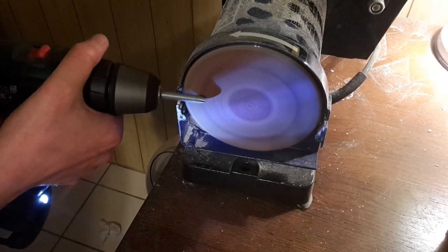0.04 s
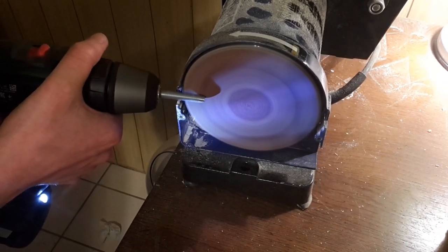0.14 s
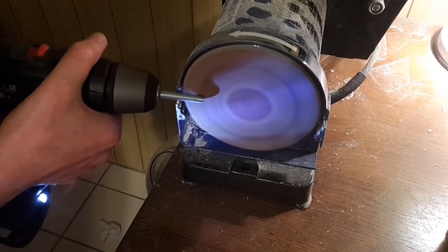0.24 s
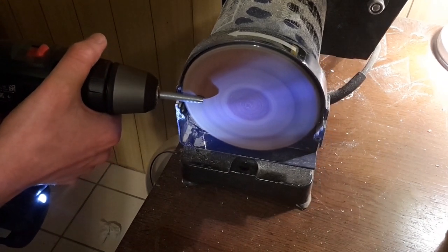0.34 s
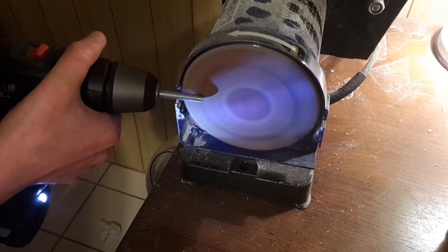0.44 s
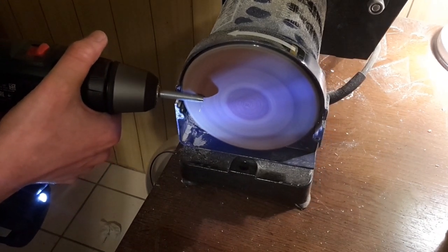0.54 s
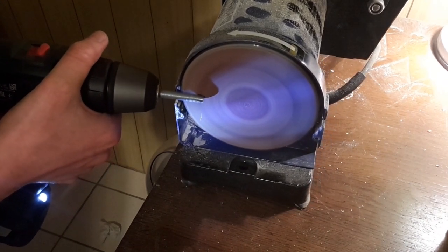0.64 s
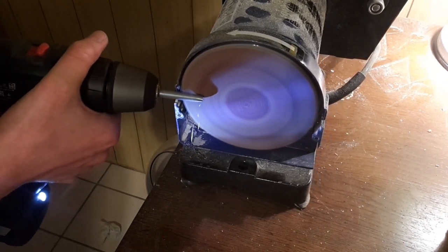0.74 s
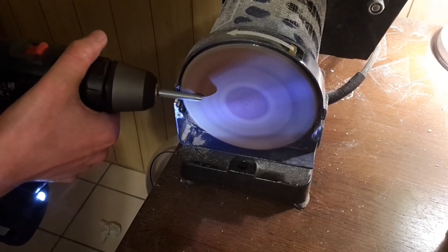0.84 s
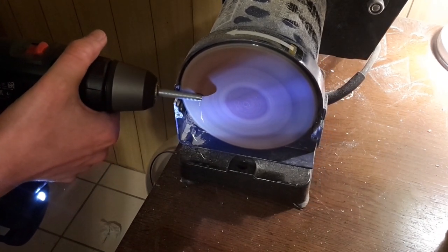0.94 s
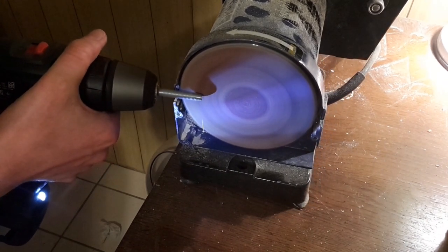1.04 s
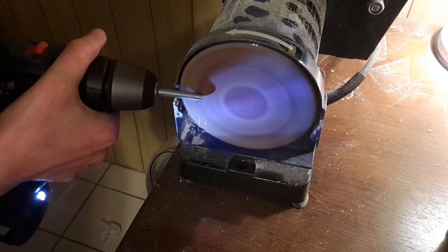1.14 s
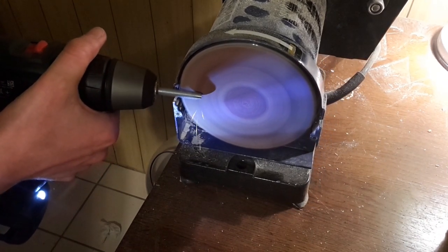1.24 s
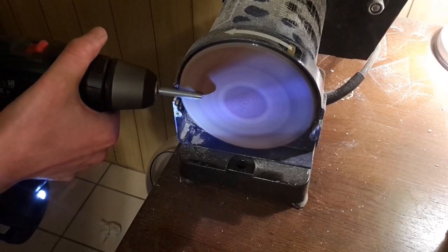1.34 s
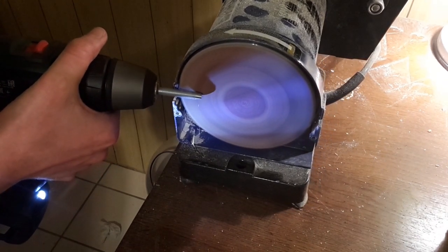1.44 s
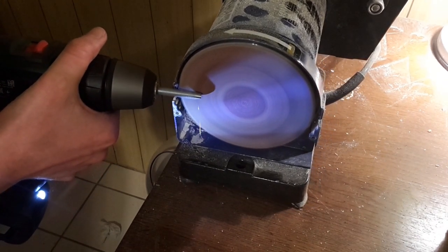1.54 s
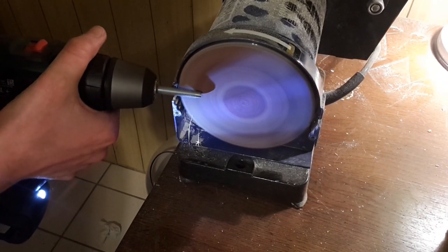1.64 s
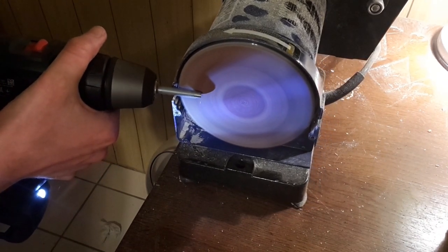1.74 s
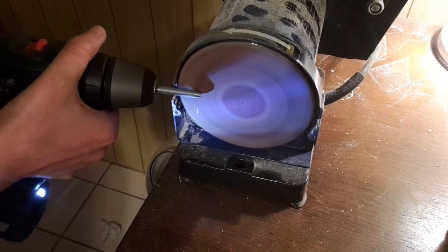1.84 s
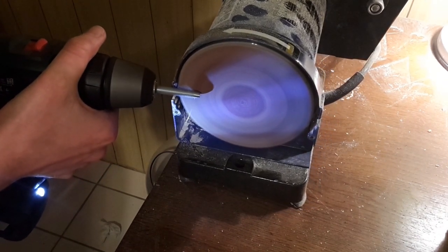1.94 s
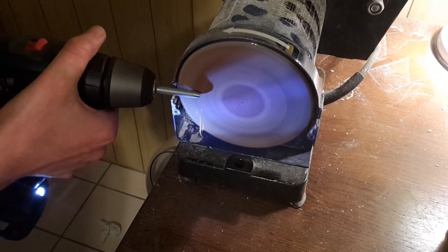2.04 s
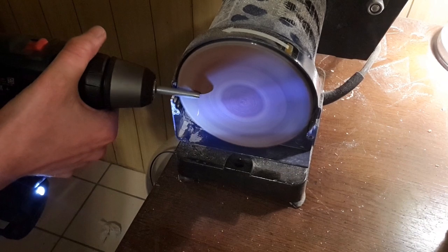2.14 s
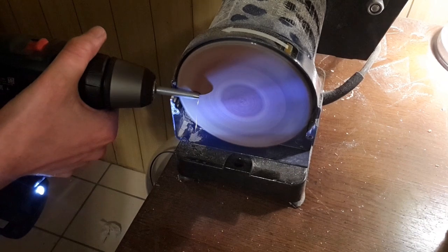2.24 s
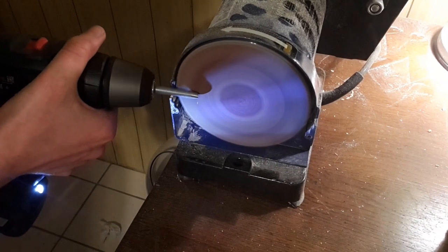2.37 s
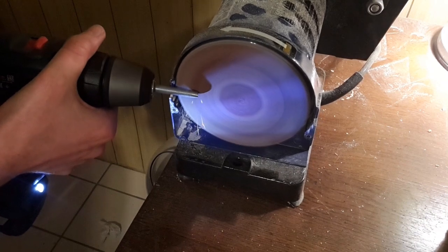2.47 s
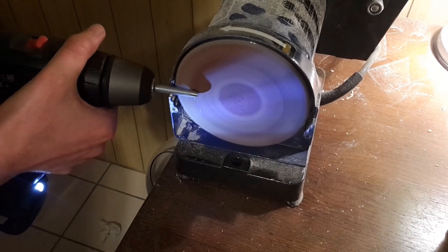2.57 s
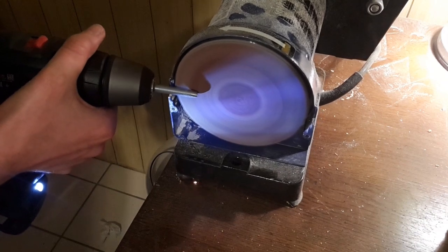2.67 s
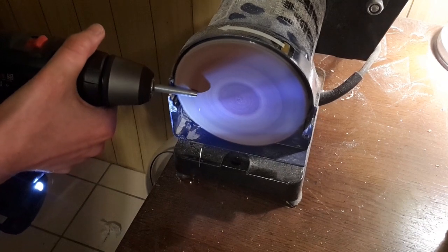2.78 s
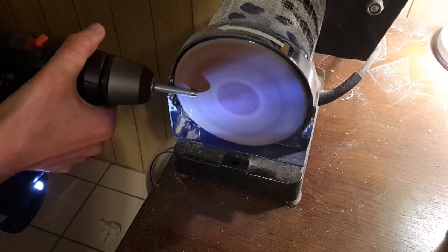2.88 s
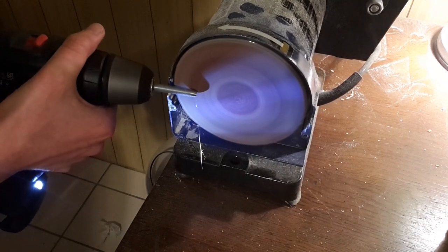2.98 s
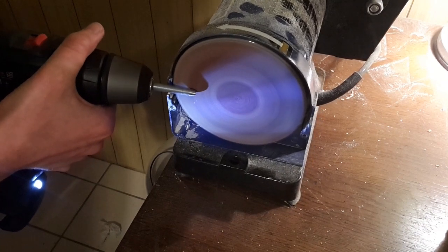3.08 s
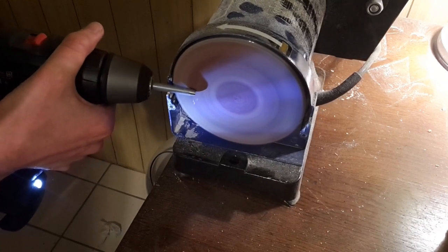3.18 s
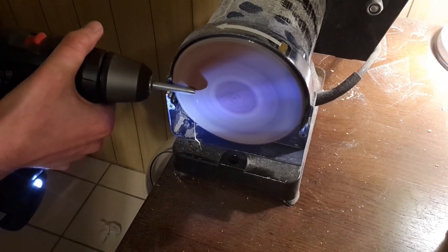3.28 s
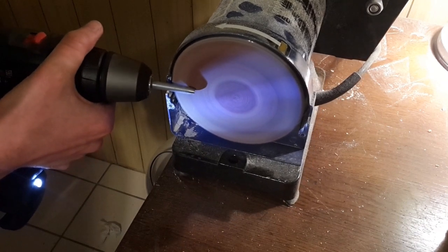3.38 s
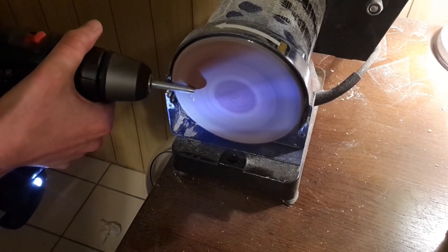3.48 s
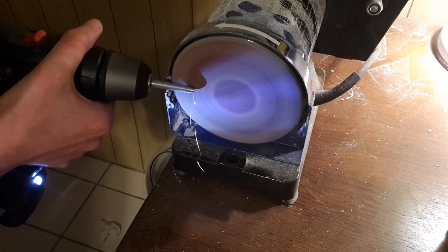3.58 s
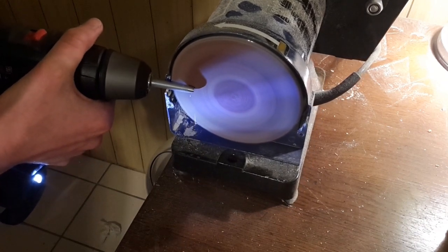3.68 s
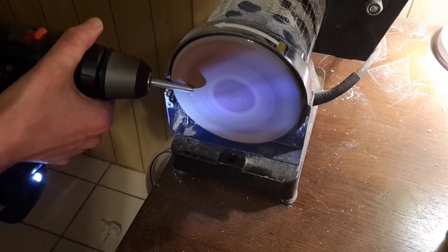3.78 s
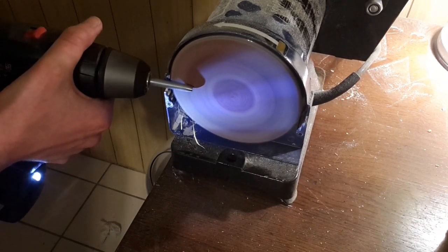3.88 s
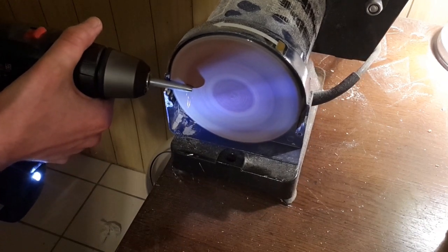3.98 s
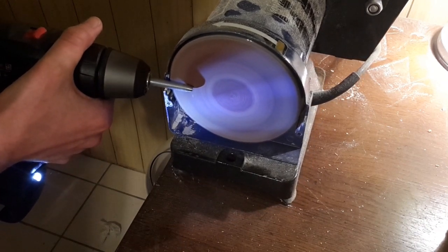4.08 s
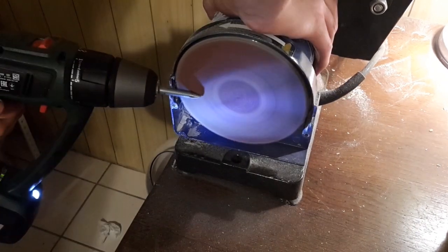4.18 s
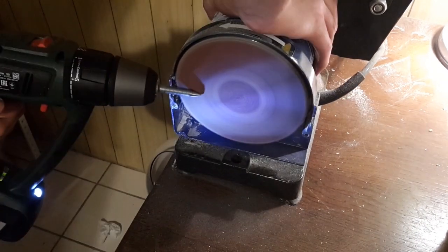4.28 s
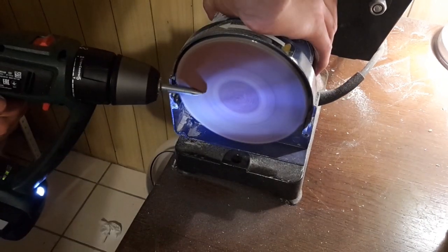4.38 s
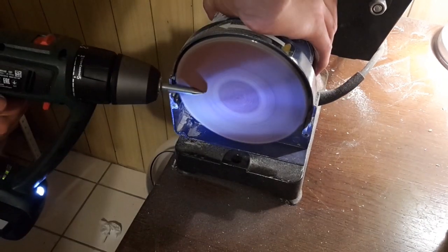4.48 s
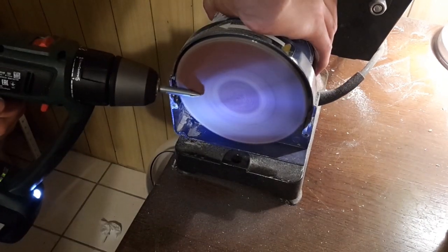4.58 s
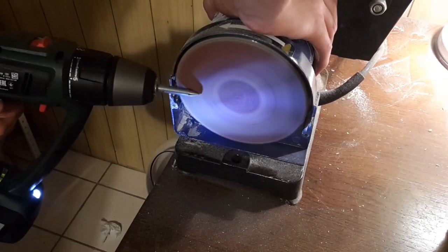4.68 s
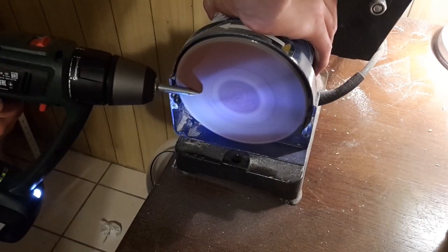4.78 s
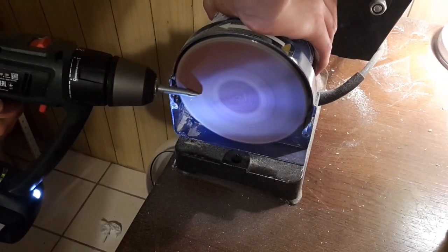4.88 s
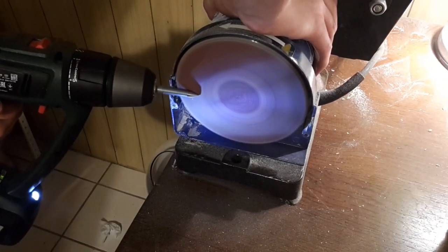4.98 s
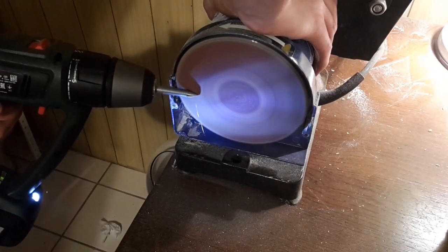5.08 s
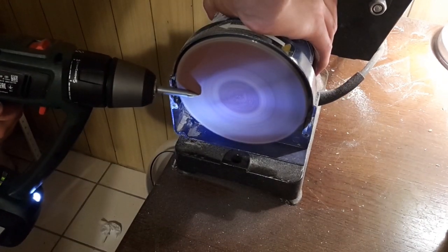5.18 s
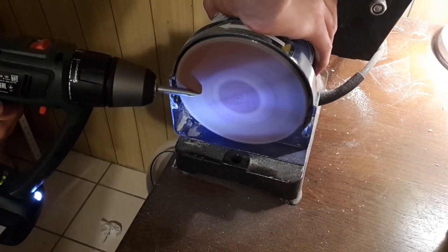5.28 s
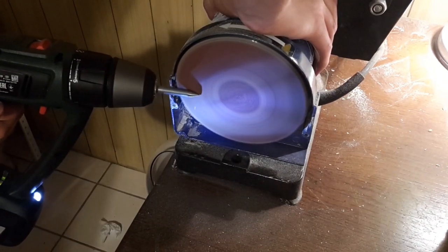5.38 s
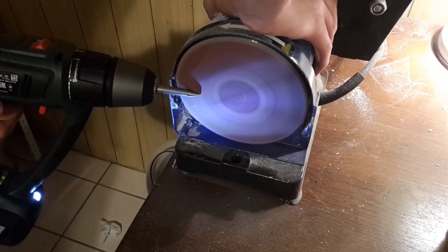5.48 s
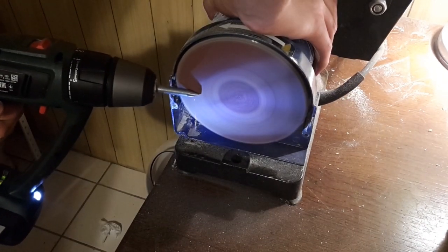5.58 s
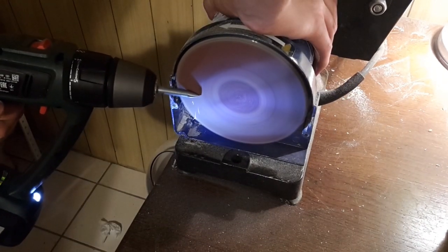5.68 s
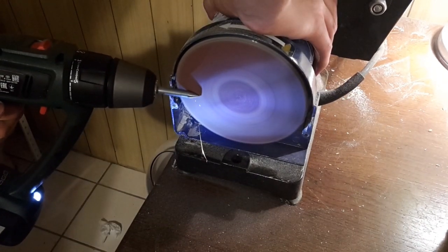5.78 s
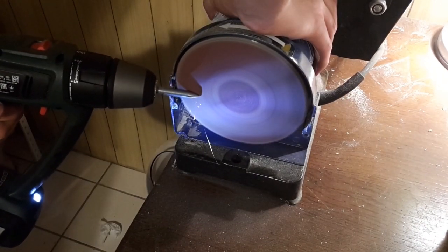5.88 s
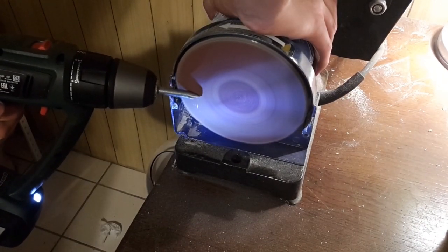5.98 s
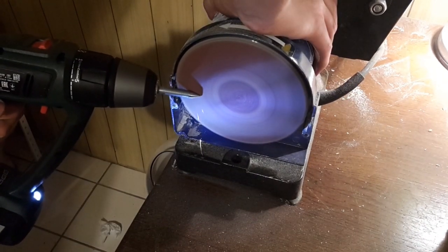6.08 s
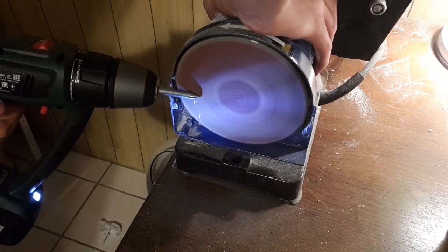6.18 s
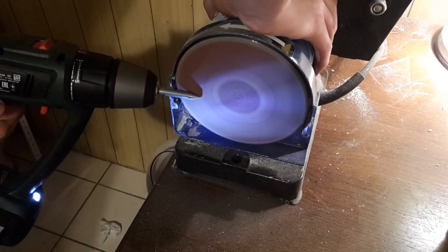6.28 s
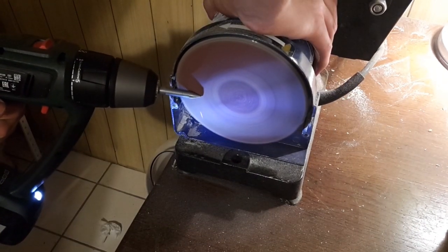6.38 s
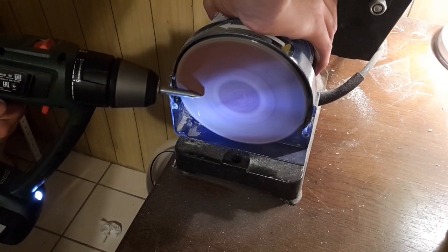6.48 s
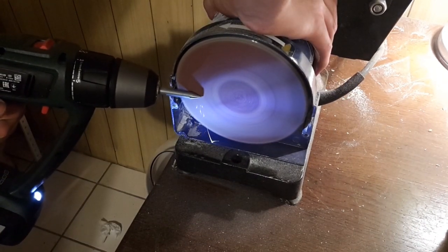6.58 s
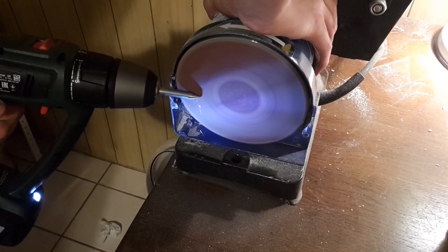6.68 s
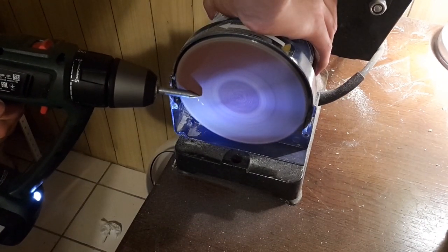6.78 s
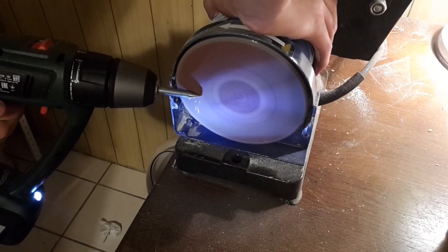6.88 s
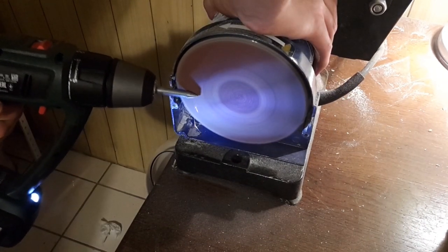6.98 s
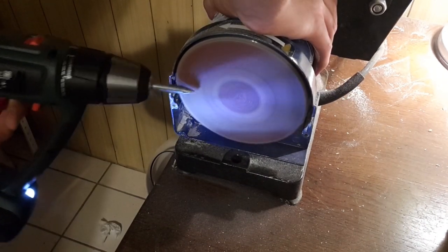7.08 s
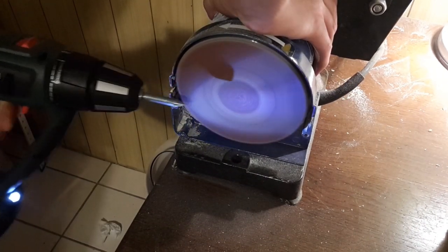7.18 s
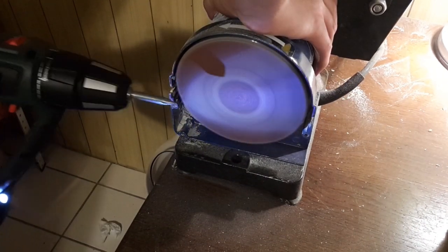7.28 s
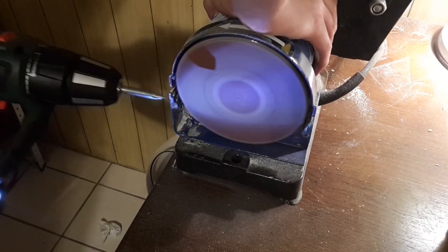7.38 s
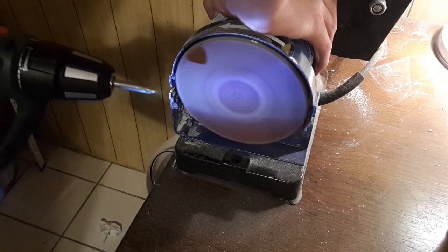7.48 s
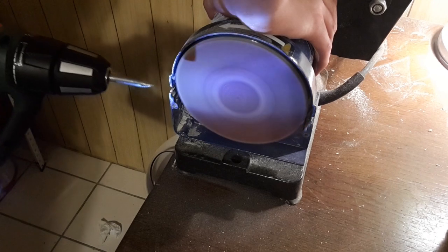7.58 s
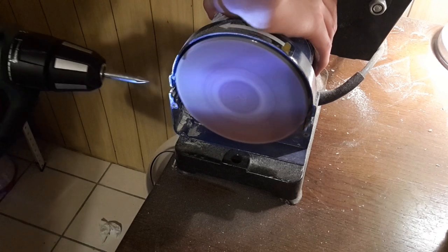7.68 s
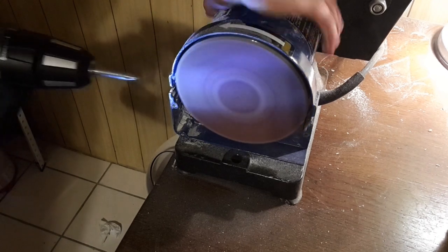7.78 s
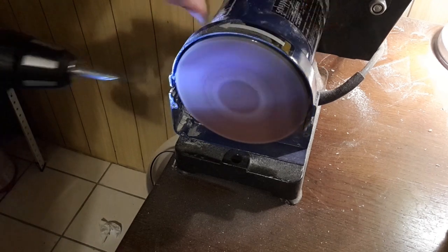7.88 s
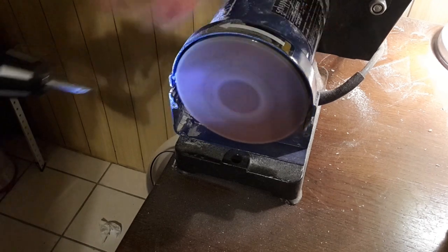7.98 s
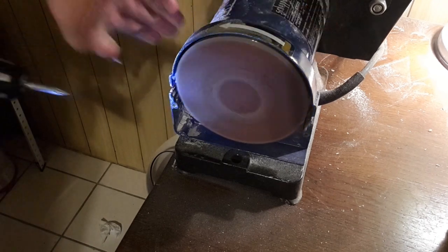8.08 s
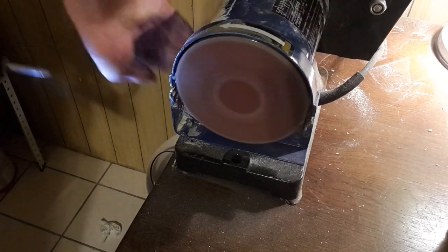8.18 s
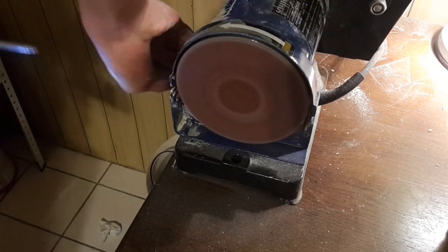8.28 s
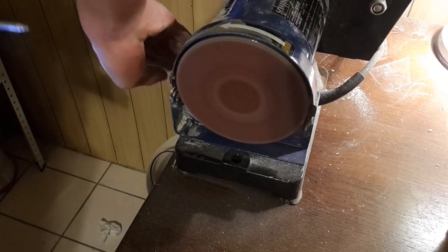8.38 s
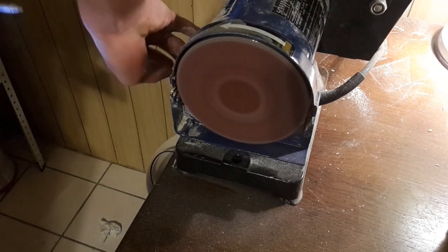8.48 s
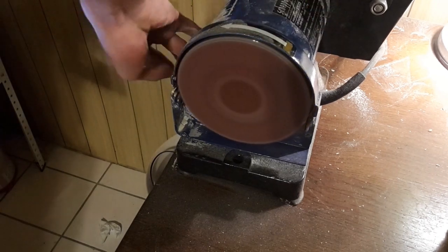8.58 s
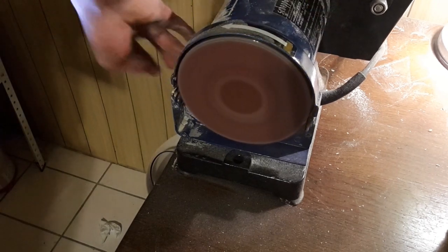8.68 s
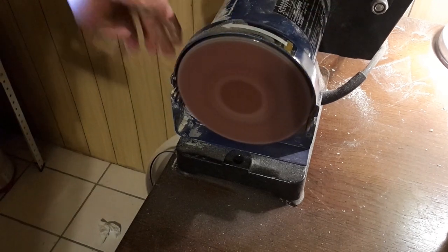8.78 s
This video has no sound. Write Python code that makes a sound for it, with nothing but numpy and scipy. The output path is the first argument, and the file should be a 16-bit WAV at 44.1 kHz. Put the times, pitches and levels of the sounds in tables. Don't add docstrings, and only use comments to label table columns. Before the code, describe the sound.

From 0 s a close, loud, bright hiss runs without pause: a steel rod pressed on a spinning sanding disc. It is fine and sizzling, strongest very high up, with thin metallic ringing and a fast buzz-like flutter of about 48 turns per second. Pressure wavers slightly in the first second, then holds steady; around 2-2.6 s the ringing shifts a little. A low motor hum and rumble lie faintly beneath. At about 4.1 s the grip changes: the hiss becomes rougher and less regular until about 4.8 s, then steadier with a different ring. Near 7.1 s come quick scuffs and the hiss cuts off, with a very short tail. The motor's hum and airy whirr remain, swelling clearly from 7.85 to 8.3 s. From 8.35 to 8.65 s a hand makes soft thuds and scrapes on the disc; after 8.6 s the hum drops in pitch and weakens until the end at about 8.8 s.

```python
import sys
import numpy as np
from scipy import signal
from scipy.io import wavfile
from scipy.ndimage import uniform_filter1d

SR = 44100
rng = np.random.default_rng(int(sys.argv[2]) if len(sys.argv) > 2 else 0)


def output_pcm(signal):
    pcm = np.clip(np.atleast_2d(signal).T, -1, 1) * 32767
    wavfile.write(sys.argv[1], SR, np.round(pcm).astype(np.int16))


def decibels_to_gain(level_db):
    exponent = np.asarray(level_db, float) / 20
    return 10 ** exponent


N = 389403
TIME = np.arange(N) / SR
SCENE_CHANGE_S = (4.09, 4.17)
LIFT_S, SKIP_S = 7.12, .04


def rms_one(x):
    return x / np.sqrt(np.mean(x ** 2) + 1e-20)


def columns(rows, at, log=False):
    key, *values = np.transpose(rows)
    warp = np.log if log else np.asarray
    return [np.interp(warp(at), warp(key), v) for v in values]


def drift(rate):
    r = np.exp(-80 * np.pi * rate / SR)
    noise = rng.standard_normal(N // 40 + 2002)
    slow = signal.lfilter([1], [1, -2 * r, r * r], noise)[2000:]
    return np.interp(np.arange(N) / 40, np.arange(len(slow)), rms_one(slow))


def patches(shape, size):
    field = rng.standard_normal(shape).astype(np.float32)
    for axis, span in enumerate(size, 1):
        for _ in range(2):
            field = uniform_filter1d(field, span, axis=axis, mode="wrap")
    return rms_one(field)


def colour(table, rings, hz):
    narrow_db = sum(db / (1 + (2 * (hz - centre) / width) ** 2) for centre, width, db in rings)
    return decibels_to_gain(np.array(columns(table, hz, log=True)) + narrow_db)


# f/Hz, shared power [0-1]
SIDE_LIKENESS = [(60, 0.83), (200, 0.88), (380, 0.68), (700, 0.61), (1300, 0.43), (2400, 0.62),
                 (5000, 0.82), (9000, 0.42), (15000, 0.5)]
LEFT_LAG = 28


def radiate(sources, gain_at, echoes, flicker_db):
    late = np.roll(sources[0], LEFT_LAG)
    stacked = np.vstack([sources, late]).astype(np.float32)
    hz, s, (shared, left, right, late) = signal.stft(stacked, SR, nperseg=1024)
    hz = np.maximum(hz, 10)[:, None]
    alike = np.clip(columns(SIDE_LIKENESS, hz, log=True)[0], 0, 1)
    lagging = (hz > 2000) & (hz < 6000) & (s < SCENE_CHANGE_S[1])
    shared_left = np.where(lagging, late, shared)
    ears = np.sqrt(alike) * np.array([shared_left, shared]) + np.sqrt(1 - alike) * np.array([left, right])
    wet = echoes * np.minimum((hz / 4500) ** 0.38, 1)
    scattered = patches(ears.shape, size=(3, 181)) * 0.24 + 1j * patches(ears.shape, size=(4, 181))
    paths = np.exp(wet * scattered)
    flicker = decibels_to_gain(flicker_db * patches(ears.shape, size=(40, 3)))
    return signal.istft(ears * gain_at(hz, s) * paths * flicker, SR, nperseg=1024)[1][:, :N]


# multiple of the hum, level/dB, waver/dB
HUM_PARTIALS = [(.61, -18, 2), (1, 0, .7), (1.57, -6, 1.2), (2.01, -5, 1.5), (3.0, -9, 1.5), (4.01, -9, 2),
                (5.0, -8, 2), (6.0, -1, 2.5)]
HUM_HZ, SWITCH_OFF_S, SLOWING_HZ_PER_S2, SLOWING_DB_PER_HZ = 88.3, 8.6, 326, .33
HUM_DB = (-83, -73.5, -86, -75, -70)
UPPER_DB = (-11, -2.5, 2.5, 7, 3.5)
HUM_SETTLES_S, FREED_S = 2.4, (0.067, 0.9)


def hum():
    slowed_hz = SLOWING_HZ_PER_S2 * np.maximum(TIME - SWITCH_OFF_S, 0) ** 2
    stages_s = [0, HUM_SETTLES_S, *SCENE_CHANGE_S, LIFT_S - SKIP_S, *(LIFT_S + np.array(FREED_S))]
    held = [1, 2, 2, 1, 1]
    hum_db = np.interp(TIME, stages_s, np.repeat(HUM_DB, held)) - SLOWING_DB_PER_HZ * slowed_hz
    upper_db = np.interp(TIME, stages_s, np.repeat(UPPER_DB, held))
    phase = 2 * np.pi * np.cumsum(HUM_HZ - slowed_hz) / SR
    tone = 0
    for k, partial_db, waver_db in HUM_PARTIALS:
        level_db = hum_db + 1.5 + partial_db + upper_db * (k > 1.3) + waver_db * drift(0.87)
        tone = tone + decibels_to_gain(level_db) * np.sin(k * phase + k * 0.11 * drift(4.5))
    return tone * decibels_to_gain(np.array([[-1.2], [1.2]]))


# t/s, level/dB
HOUSING_LEVEL = [(0, -64), (.8, -58.5), (2, -58), (4.1, -51.5), (4.7, -60), (5.5, -63.5), (6.3, -62.5),
                 (7.1, -60.5), (7.12, -56), (7.7, -54.5), (8.83, -57)]
# f/Hz, left level/dB, right level/dB
MOTOR_COLOUR = [(40, -36, -25), (97.5, -17, -11.5), (324, -11.5, -8.5), (556, -14.5, -11),
                (1180, -8.5, -6.5), (2110, -8, -5.5), (3470, -11.5, -10), (4800, -14.5, -8),
                (6700, -24.5, -12), (8550, -10.5, -8), (9900, 6.5, 1), (11460, -2.5, -4), (13000, -7, -2.5),
                (15600, -13.5, -9.5)]
# f/Hz, width/Hz, level/dB over the broad colour
HOUSING_RINGS = [(522.1, 27.3, 18.5), (754, 84.4, 19.5), (1020, 185, 10), (1551, 44, 5.5), (2050, 98, 5),
                 (3070, 52, 11.5), (3450, 40, 8)]
# t/s, scrape level/dB, thud level/dB, width/s
HAND_BRUSHES = [
    (8.374, 0, 9.5, 0.0075),
    (8.445, 2.5, 8, 0.028),
    (8.55, 2.5, 3.5, 0.035),
    (8.62, 6, 6.5, 0.029),
]
AIR_DB, AIR_FOLLOWS = -59, 0.46
SHIELD_DB = -7


def motor():
    lumps = drift(18)

    def gain_at(hz, s):
        high = 1 / (1 + (1800 / hz) ** 4)
        housing_db, = columns(HOUSING_LEVEL, s)
        brush_db, thud_db = sum(np.outer(db, np.exp(-((s - at) / width) ** 2))
                                for at, *db, width in HAND_BRUSHES)
        rumble_db = housing_db + thud_db + 1.9 * np.interp(s, TIME, lumps)
        shielded = np.interp(s, [*SCENE_CHANGE_S, LIFT_S - SKIP_S, LIFT_S], [0, 1, 1, 0])
        air_db = AIR_DB + AIR_FOLLOWS * (housing_db + 53) + SHIELD_DB * shielded
        scrape = np.exp(-np.log(hz / 2100) ** 2 / 0.5)
        level_db = 11.5 + (1 - high) * rumble_db + high * air_db + scrape * brush_db
        return colour(MOTOR_COLOUR, HOUSING_RINGS, hz) * decibels_to_gain(level_db)

    return radiate(rng.standard_normal((3, N)), gain_at, echoes=.6, flicker_db=0.5)


# t/s, turns per second [1/s]
DISC_SPEED = [(0, 48.63), (1.65, 48.63), (2.25, 48.49), (3.6, 48.53), (4.35, 48.7), (4.95, 48.31),
              (6.0, 48.11), (6.45, 48.18), (7.1, 48.08)]


def disc_turns():
    return np.cumsum(columns(DISC_SPEED, TIME)[0]) / SR


# multiple of disc speed, early level/dB, late first-grip level/dB, second-grip level/dB
DISC_PARTIALS = [(8, -82, -81, -83), (9, -84, -83, -86), (23, -75, -78, -83), (26, -76, -76, -81),
                 (27, -87, -82, -79), (30, -92, -92, -81), (33, -79, -79, -94), (37, -84, -79, -94),
                 (44, -85, -92, -83), (48, -83, -76, -97), (49, -88, -93, -83), (50, -83, -79, -101),
                 (52, -78, -78, -100), (53, -87, -82, -82), (58, -79, -80, -78)]


def disc_tones():
    angle = 2 * np.pi * disc_turns() + 0.0025 * drift(8.7)
    stages_s = [1.5, 2.5, *SCENE_CHANGE_S, 7.1, 7.13]
    out = 0
    for k, early_db, late_db, second_db in DISC_PARTIALS:
        db = np.interp(TIME, stages_s, [early_db, late_db, late_db, second_db, second_db, -130])
        offsets = rng.uniform(0, 2 * np.pi) + rng.normal(0, k / 40, (2, 1))
        level = decibels_to_gain(db + 7.5 + 2.0 * drift(9))
        out = out + level * np.sin((k * angle % (2 * np.pi) + offsets).astype(np.float32))
    return out


# t/s, level/dB
ROD_PRESSURE = [(0.0, -39.5), (0.63, -42), (0.81, -41.5), (1.0, -40), (1.38, -40.5), (3.98, -41),
                (4.43, -41.5), (4.47, -43), (4.67, -39.5), (5.89, -43), (6.0, -41.5), (6.95, -41),
                (7.07, -40.5)]
SKIP_DB, PART_DB, FADE_DB_PER_S = -3.5, -9.5, 110


def contact(s):
    lift_s = [LIFT_S - SKIP_S - .005, LIFT_S - SKIP_S, LIFT_S, LIFT_S + 0.0075]
    lift_db = np.interp(s, lift_s, [0, SKIP_DB, SKIP_DB, PART_DB])
    after = np.maximum(s - LIFT_S - .02, 0)
    fade_db = FADE_DB_PER_S * after + 170 * np.maximum(after - .1, 0)
    return columns(ROD_PRESSURE, s)[0] + lift_db - fade_db


GRAINS_PER_TURN = 1814


def grit(turns, share, slip, renewal, spread_db):
    grains = rng.standard_normal((int(turns[-1]) + 3, GRAINS_PER_TURN))
    grains *= decibels_to_gain(spread_db * rng.standard_normal(grains.shape))
    worn = signal.lfilter([1], [1, renewal - 1], grains, axis=0)
    place = (turns + 1) * GRAINS_PER_TURN + 2 * slip
    again = rms_one(np.interp(place, np.arange(worn.size), worn.ravel()))
    return np.sqrt(share) * again + np.sqrt(1 - share) * rng.standard_normal(N)


# t/s, share of grit met again [0-1]
TIP_TRACK = [
    (0, .7),
    (.7, .95),
    (3.8, .91),
    (4.2, .45),
    (4.7, .3),
    (5.2, .75),
]
# f/Hz, left level/dB, right level/dB
FIRST_BROAD = [(199, -31, -31), (444, -20, -27), (1400, -22, -27), (2520, -18, -17), (3950, -15, -6),
               (4200, -11, -8.5), (6650, -17.5, -12.5), (7830, -13.5, -13), (8500, -43, -2),
               (9330, -3.5, -4.5), (10500, 1, -6), (11370, -2, -6.5), (13100, -9.5, -10.5)]
FIRST_EDGE = [(15600, -10.5, -8.5)]
SECOND_BROAD = [(204, -34, -33), (500, -30, -31), (1400, -24, -23), (2460, -22.5, -22.5), (3560, -22, -16),
                (4860, -22.5, -16.5), (6540, -23.5, -14.5), (7300, -29, -12), (8500, -9.5, -15),
                (9440, -6.5, 0.5), (10400, 0.5, -19.5), (11230, -1.5, -9.5), (13500, -13, -7.5)]
SECOND_EDGE = [(15600, -9, -6.5)]
# f/Hz, width/Hz, level/dB over the broad colour
FIRST_RINGS = [(3410, 230, 3), (3900, 130, -13), (4120, 100, -12), (4550, 120, 3), (4950, 120, 11),
               (5880, 170, -11), (6480, 190, 2), (6850, 120, -6), (7200, 200, -11), (8400, 100, 3),
               (8690, 60, 4), (9420, 60, 3), (9800, 70, 6), (10080, 150, -3), (10420, 120, 5),
               (11300, 150, 2), (12000, 130, 3), (13400, 250, 3), (14100, 300, -3)]
SECOND_RINGS = [(2200, 150, -5), (3420, 160, 7), (4010, 99, 5), (4920, 110, 7), (5570, 110, 11),
                (5850, 120, -13), (6130, 170, -18), (6380, 70, -10), (6550, 120, 6), (7120, 70, 5),
                (9200, 90, 4), (9810, 50, 3), (10480, 90, 4), (11100, 200, 3), (11900, 60, 3),
                (12500, 90, 3), (12800, 200, -3)]
# f/Hz, width/Hz, level/dB change
TILT_RINGS = [(5010, 120, -4.5), (9890, 230, 2.5), (10430, 350, -6), (11100, 330, 2.5), (12000, 300, -3)]
# t/s, level/dB extra
LAST_SCUFFS = [
    (7.093, 5.4),
    (7.113, 8.7),
    (7.17, 8.6),
]
TILT_S, SCUFF_S = (2.0, 2.6), .0036
SLIP_LEAST, SLIP_PER_LOSS, SLIP_MOST = .42, 3.0, 1
HISS_DB, USUAL_DB = 3.0, -41.5
RASP_DB, RASP_LAGS, RASP_MOST_DB = -14.5, 0.27, -7
ROUGHER_S, ROUGHER_RASP_DB, SECOND_RASP_DB = (4.1, 4.25, 4.652, 4.8), 5, 2
PAN_DB, PAN_DB_PER_S = 1.8, -0.18


def grinding():
    turns = disc_turns()
    share, = columns(TIP_TRACK, TIME)
    slip = np.minimum(SLIP_LEAST + SLIP_PER_LOSS * (share.max() - share), SLIP_MOST) * drift(12.5)
    sources = np.array([grit(turns, share, slip, renewal=.05, spread_db=2.0) for _ in range(3)])

    def gain_at(hz, s):
        second = np.interp(s, SCENE_CHANGE_S, [0, 1])
        tilt = np.interp(s, TILT_S, [0, 1])
        early = colour(FIRST_BROAD + FIRST_EDGE, FIRST_RINGS, hz)
        late = colour(FIRST_BROAD + FIRST_EDGE, FIRST_RINGS + TILT_RINGS, hz)
        first_body = (1 - tilt) * early + tilt * late
        second_body = colour(SECOND_BROAD + SECOND_EDGE, SECOND_RINGS, hz)
        body = (1 - second) * first_body + second * second_body
        rough_db = np.interp(s, ROUGHER_S, [0, ROUGHER_RASP_DB, ROUGHER_RASP_DB, SECOND_RASP_DB])
        rasp_db = RASP_DB + rough_db - RASP_LAGS * (contact(s) - USUAL_DB)
        rasp_db = np.minimum(rasp_db, RASP_MOST_DB)
        low = 1 / (1 + (hz / 7200) ** 12)
        pan_db = PAN_DB + PAN_DB_PER_S * s
        sides_db = np.array([pan_db, -pan_db])[:, None] / 2
        return body * decibels_to_gain(10.0 + low * (rasp_db + 10.5) + sides_db)

    level_db = HISS_DB + contact(TIME)
    level_db += 0.7 * np.sin(2 * np.pi * turns) + 0.4 * np.sin(4 * np.pi * turns + 3.3)
    level_db += 0.5 * drift(23.3)
    for s, db in LAST_SCUFFS:
        level_db += db * np.exp(-((TIME - s) / SCUFF_S) ** 2)
    return decibels_to_gain(level_db) * radiate(sources, gain_at, echoes=1.0, flicker_db=0.52)


def scene():
    return grinding() + disc_tones() + motor() + hum()


def band_limit(x):
    return signal.sosfilt(signal.butter(12, 17000, fs=SR, output="sos"), x)


RECOVERY_S, RECOVERY_DB = (7.853, 8.31), 12


def record(dry):
    dry = dry * decibels_to_gain(np.interp(TIME, RECOVERY_S, [0, RECOVERY_DB]))
    dry = signal.sosfilt(signal.butter(2, 40, "high", fs=SR, output="sos"), dry)
    dry = signal.sosfilt(signal.ellip(12, .5, 70, 15720, fs=SR, output="sos"), dry)
    return band_limit(dry)


dry = scene()
out = record(dry)
output_pcm(out)
```